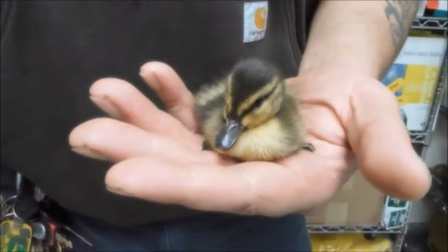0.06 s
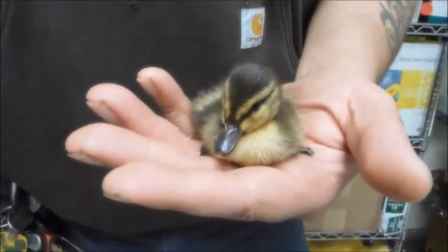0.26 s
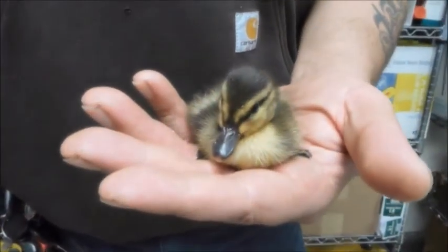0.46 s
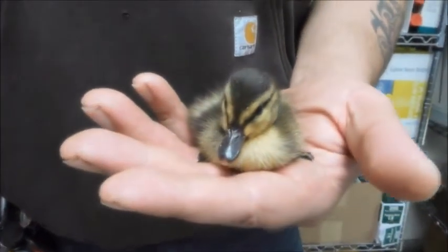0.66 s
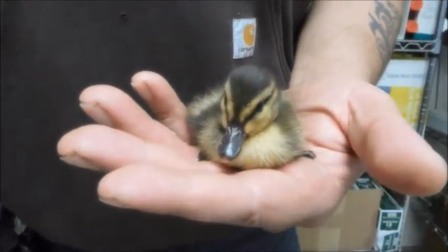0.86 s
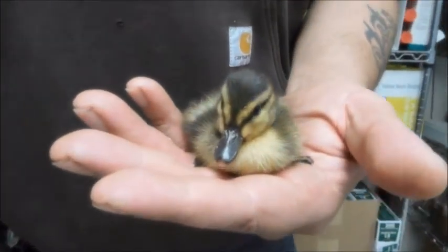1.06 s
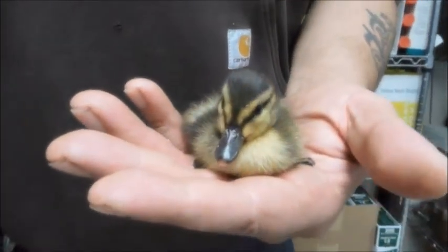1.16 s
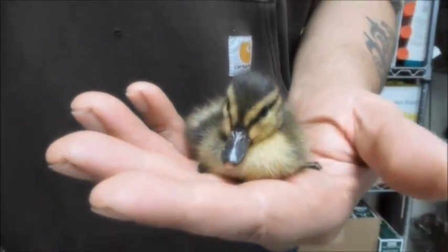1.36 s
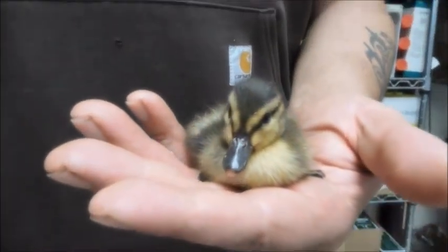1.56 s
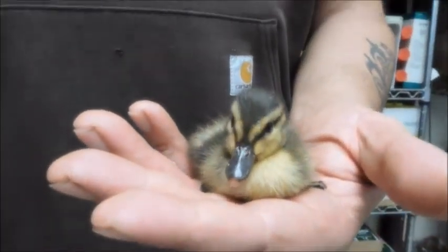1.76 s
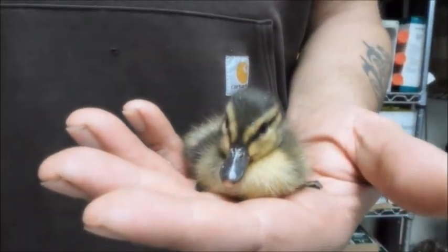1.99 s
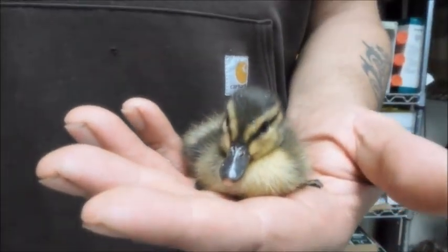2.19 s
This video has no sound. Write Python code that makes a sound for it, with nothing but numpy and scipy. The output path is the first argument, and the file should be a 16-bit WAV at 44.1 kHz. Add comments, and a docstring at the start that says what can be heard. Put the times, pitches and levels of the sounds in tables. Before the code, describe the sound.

A duckling gives a short, high peep close to the microphone, followed by a soft double bump and faint rustles. It twitters three quiet notes, then peeps again. A machine hums faintly in the room throughout.

```python
"""Duckling in the hand

A hand-held duckling peeps twice, close up, with a soft three-note twitter in between. Each peep is
an almost pure whistle that arches in pitch, with a little air hissing through the bill. A machine
hums steadily behind it; a soft double bump and faint rustles come around the first peep."""
import sys
import numpy as np
from scipy import signal
from scipy.fft import rfft, irfft
from scipy.io import wavfile
from scipy.ndimage import uniform_filter1d

SR = 44100
rng = np.random.default_rng(int(sys.argv[2]) if len(sys.argv) > 2 else 0)


def to_wav(s):
    """Save 16-bit WAV."""
    ch = np.atleast_2d(s).T  # columns
    pcm = np.round(np.clip(ch, -1, 1) * 32767)  # PCM
    wavfile.write(sys.argv[1], SR, pcm.astype(np.int16))


N = 98431
TIME = np.arange(N) / SR


def amp(db):
    """Decibels to gain."""
    return 10 ** (np.asarray(db) / 20)


def unit(x):
    """Scales to rms 1."""
    return x / np.sqrt(np.mean(x ** 2) + 1e-20)


def curve_at(points, hz):
    """Reads a curve on a log-frequency axis."""
    f, value = np.transpose(points)
    return np.interp(np.log(hz + 1), np.log(f + 1), value)


def drift(rate_hz):
    """Smooth random modulation of rms 1, rolling off around the given rate."""
    f = np.fft.rfftfreq(2 * N, 1 / SR)
    return unit(irfft(rfft(rng.standard_normal(2 * N)) * np.exp(-(f / rate_hz) ** 2))[:N])


def noise(colour, tilt_db):
    """Coloured noise of rms 1, tilted by tilt_db per octave."""
    f = np.fft.rfftfreq(N, 1 / SR)
    eq = amp(curve_at(colour, f) + tilt_db * np.log2(f + 1))
    return unit(irfft(rfft(rng.standard_normal(N)) * eq, N))


def arch(start, length):
    """Half-sine envelope, from 0 up to 1 and back."""
    return np.maximum(np.sin(np.pi * np.clip((TIME - start) / length, 0, 1)), 0)


def swell(start, rise):
    """Envelope that rises to 1 and dies away more slowly."""
    u = np.maximum(TIME - start, 0) / rise
    return u * np.exp(1 - u)


def machine_hum():
    """A motor's deep throb under mains harmonics that waver in level and phase."""
    # level ride of the throb: t/s, level/dB
    throb_ride = [(.1, -46.5), (.85, -54), (1.35, -50), (1.55, -51.5), (1.8, -45.5), (2.2, -51.5)]
    # mains harmonics: f/Hz, level/dB, waver/dB
    harmonics = [(118.8, -66.5, 4), (239.3, -58, 0.85), (358, -63, -0.6)]
    throb_hz, sway_rad = 29.5, 0.15
    throb_gain = amp(np.interp(TIME, *np.transpose(throb_ride)))
    hum = throb_gain * unit(np.sin(2 * np.pi * (throb_hz * TIME + rng.random())))
    for hz, db, waver_db in harmonics:
        gain = amp(db + waver_db * drift(3.6))
        phase = 2 * np.pi * (hz * TIME + rng.random()) + sway_rad * drift(3)
        hum += gain * unit(np.sin(phase))
    return hum


def room_tone():
    """A steady, faintly mottled bed of air noise: centred in the bass, wide in the treble."""
    # colour of the bed: f/Hz, relative level/dB
    colour = [(12, -4), (45, -1), (64, -12), (80, -2), (100, -2), (140, -6), (185, -4), (280, -6.5),
              (400, -7.5), (520, -11), (750, -10.5), (1300, -13.5), (2100, -15), (4500, -20.3),
              (9000, -24.5), (15500, -24.5)]
    # stereo image: f/Hz, left-right correlation/0-1
    correlation = [(40, 0.8), (150, 0.82), (350, 0.31), (700, .25), (1500, 0.1), (3000, 0.2), (6000, 0),
                   (15000, 0)]
    level_db, mottle_db = -49.5, 1
    frames, hz = N // 512 + 5, np.fft.rfftfreq(2048, 1 / SR)
    a, b, c, d, mottle = np.moveaxis(rng.standard_normal((frames, len(hz), 5)), 2, 0)
    mottle = uniform_filter1d(mottle, size=8, axis=0)  # smooth in time
    mottle = unit(uniform_filter1d(mottle, size=24, axis=1))  # and in frequency
    shared = curve_at(correlation, hz)
    left = a + 1j * b
    right = shared * left + np.sqrt(1 - shared ** 2) * (c + 1j * d)
    spectra = np.array([left, right]) * amp(curve_at(colour, hz) + mottle_db * mottle)
    bed = signal.istft(spectra.swapaxes(1, 2), nperseg=2048, noverlap=1536)[1][:, :N]
    return amp(level_db) * unit(bed)


def whistle(hz, gain, second_db=-31.5, third_db=-33):
    """The duckling's voice: a slightly unsteady sine with weak overtones, phase-blurred into a husk."""
    jitter, shimmer_db, flutter_hz, husk_rad = 0.005, 1.2, 220, 1.24
    phase = 2 * np.pi * np.cumsum(hz * (1 + jitter * drift(flutter_hz))) / SR
    tone = np.sin(phase)
    for k, db in [(2, second_db), (3, third_db)]:
        tone += amp(db) * np.sin(k * phase + husk_rad * drift(2 * flutter_hz))
    return unit(tone) * gain * amp(shimmer_db * drift(flutter_hz))


def twitter():
    """Soft notes on shallow pitch arches: one either side of the first peep, then a run of three."""
    # notes: t/s, length/s, top f/Hz, level/dB, second harmonic re the note/dB
    notes = [(.030, 0.033, 1730, -51.5, -27), (0.15, 0.02, 2030, -40, -14),
             (1.205, 0.029, 1935, -43, -11.5), (1.256, 0.021, 1975, -44, -21),
             (1.287, 0.017, 1877, -46.5, -11)]
    pitch_bend = 0.071  # share of the top pitch
    voice = np.zeros(N)
    for start, length, hz, db, second_db in notes:
        effort = arch(start, length)
        voice += whistle(hz * (1 - pitch_bend * (1 - effort)), amp(db) * effort ** 0.67, second_db)
    return voice


def rustles():
    """Faint, dull rustles: swells of midrange noise."""
    # swells: t/s, rise/s, level/dB, tilt/dB per octave
    swells = [(.045, 0.019, -54.5, 0.5), (.14, 0.07, -54, 0), (.54, 0.026, -55.5, 1.5)]
    # colour of a rustle: f/Hz, relative level/dB
    colour = [(150, -27), (400, -19), (550, -0.5), (800, 6), (1200, -8), (1800, -1), (3000, -20),
              (8000, -24.5)]
    return sum(amp(db) * swell(start, rise) * noise(colour, tilt) for start, rise, db, tilt in swells)


def bill_air():
    """Air hisses through the bill with each call, a little differently at each ear."""
    # puffs of breath: t/s, length/s, level/dB, tilt/dB per octave
    puffs = [(0.05, .110, -51, -4), (1.177, 0.14, -52, -4), (1.712, 0.11, -48, -2)]
    # colour of the hiss: f/Hz, relative level/dB
    colour = [(400, -27), (1000, -9), (1700, -4.5), (2400, 1.5), (2900, -2), (3600, 0.5), (4900, -7),
              (5700, -5.5), (7200, -7.5), (8600, -8), (10000, -17), (15000, -16)]

    def hiss():
        return sum(amp(db) * arch(start, length) ** 0.38 * noise(colour, tilt)
                   for start, length, db, tilt in puffs)
    centre, sides = hiss(), np.array([hiss(), hiss()])
    return (centre + sides) / np.sqrt(2)


def peeps():
    """Two full peeps: pitch and loudness climb and fall together."""
    # one contour per peep: t/s, f/Hz, level/dB
    contours = [
        [(.070, 1920, -44), (.074, 2030, -37.5), (.087, 2408, -31), (.094, 2367, -32), (.102, 2487, -26),
         (.117, 2468, -28.5), (.125, 2292, -34), (.130, 2240, -34), (.140, 1987, -38), (.144, 2070, -43)],
        [(1.725, 1802, -48), (1.729, 2075, -35), (1.743, 2430, -27.5), (1.757, 2457, -28), (1.765, 2390, -29),
         (1.781, 2215, -31), (1.789, 2216, -34), (1.797, 2064, -39.5), (1.805, 2040, -35), (1.810, 1930, -46),
         (1.818, 1820, -51)],
    ]
    fade_s = 0.0028
    voice = np.zeros(N)
    for contour in contours:
        t, hz, db = np.transpose(contour)
        gate = np.clip(np.minimum(TIME - t[0], t[-1] - TIME) / fade_s + 1, 0, 1)
        glide = uniform_filter1d(np.interp(TIME, t, hz), size=180)
        voice += whistle(glide, gate * amp(np.interp(TIME, t, db)))
    return voice


def bumps():
    """A dull double bump: two short swells of a low tone with a weak octave."""
    # bumps: t/s, level/dB
    hits = [(0.18, -42.5), (0.21, -46.5)]
    pitch_hz, octave_db = 210.6, -11.5
    thud = np.zeros(N)
    for start, db in hits:
        phase = 2 * np.pi * pitch_hz * (TIME - start)
        tone = unit(np.sin(phase) + amp(octave_db) * np.sin(2 * phase))
        thud += amp(db) * swell(start, rise=0.012) ** 2 * tone
    return thud


def reverb(x):
    """The room's short, diffuse tail, different for each ear."""
    # room decay: f/Hz, t60/s
    decay = [(200, .35), (2000, 0.19), (8000, 0.24)]
    hz, t, spectra = signal.stft(rng.standard_normal((2, SR // 2)), SR, nperseg=256)
    fade = amp(-60 * t / curve_at(decay, hz)[:, None])
    tail = signal.istft(spectra * fade, SR, nperseg=256)[1]
    return signal.fftconvolve(x[None], tail / np.linalg.norm(tail[0]), axes=1)[:, :N]


def scene():
    """The duckling sits just right of centre, in front of the hum."""
    pan_db, right_lead_s, reverb_db = 1.5, 0.00001, -16
    voice = peeps() + twitter()
    handling = bumps() + rustles()
    left = voice * amp(-pan_db / 2)
    right = np.interp(TIME + right_lead_s, TIME, voice) * amp(pan_db / 2)
    close = np.array([left, right]) + bill_air() + handling
    return close + amp(reverb_db) * reverb(voice + handling) + machine_hum() + room_tone()


def record(dry):
    """A steep low-pass takes off the very top of the mix."""
    cutoff_hz = 15900
    lowpass = signal.firwin(511, cutoff_hz, window=("kaiser", 9), fs=SR)
    return signal.oaconvolve(dry, lowpass[None], "same")


dry = scene()
out = record(dry)
to_wav(out)
```